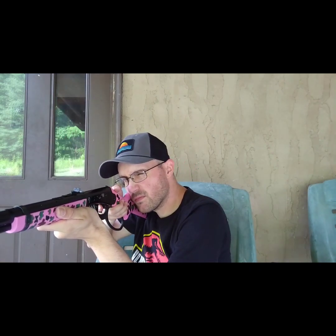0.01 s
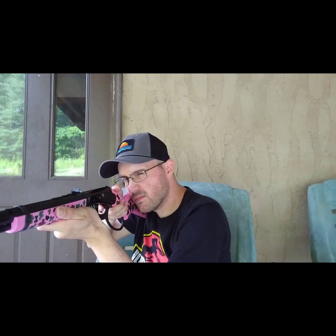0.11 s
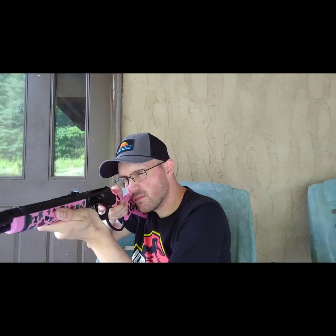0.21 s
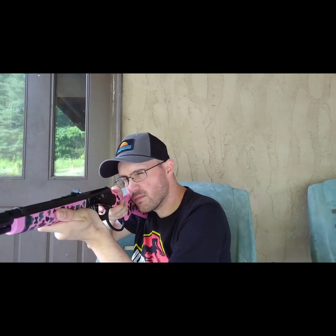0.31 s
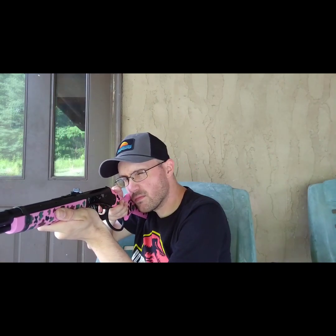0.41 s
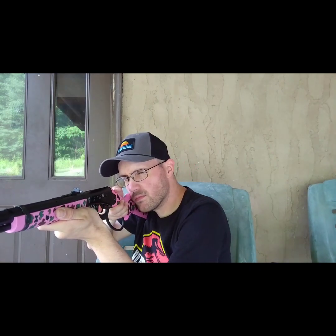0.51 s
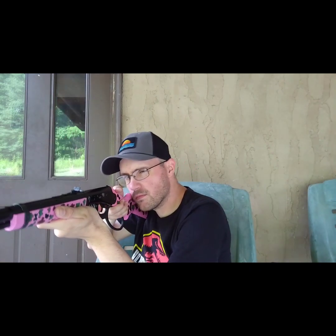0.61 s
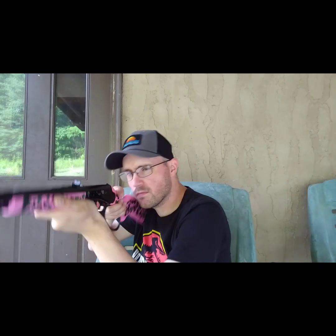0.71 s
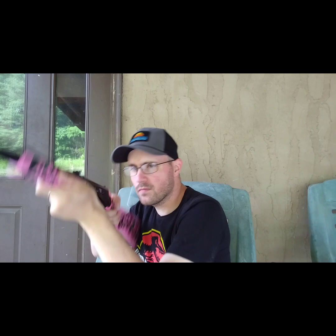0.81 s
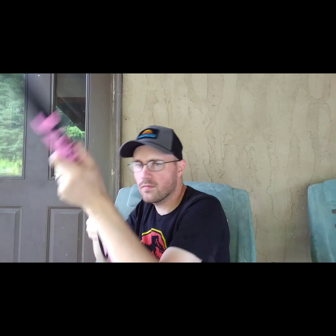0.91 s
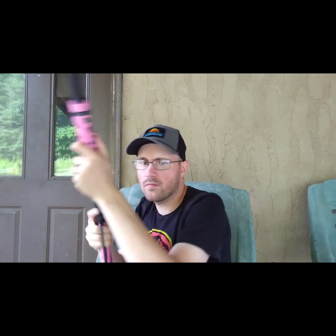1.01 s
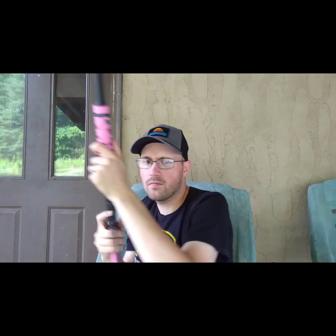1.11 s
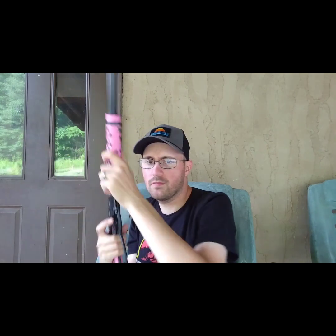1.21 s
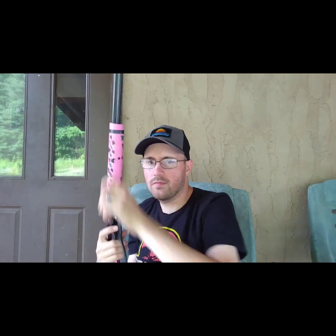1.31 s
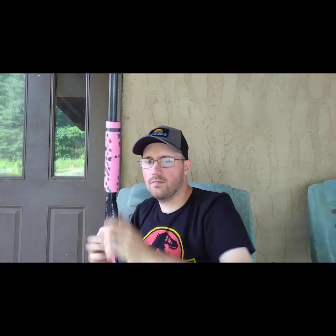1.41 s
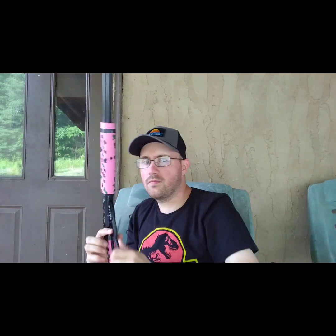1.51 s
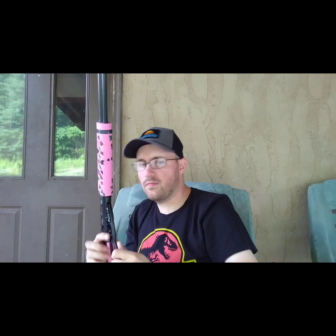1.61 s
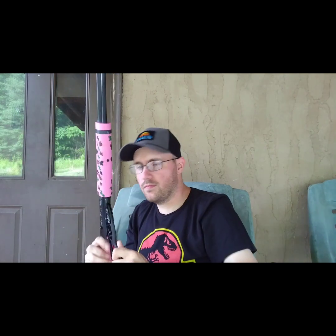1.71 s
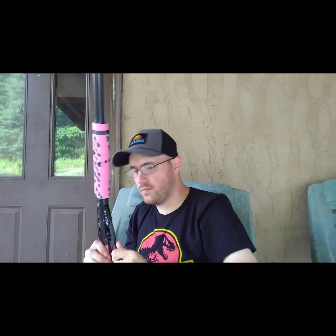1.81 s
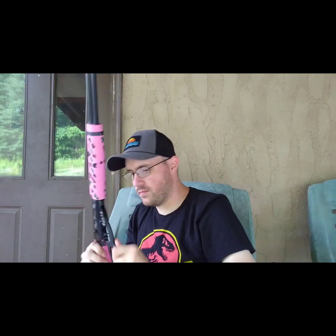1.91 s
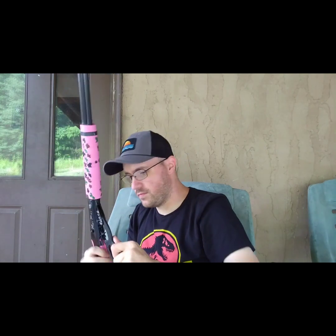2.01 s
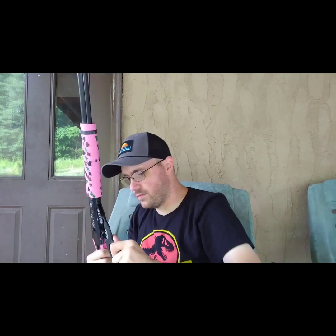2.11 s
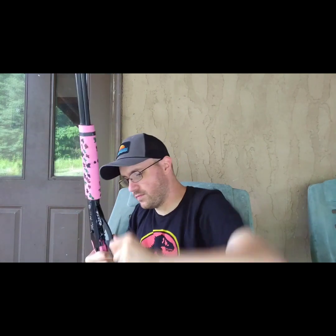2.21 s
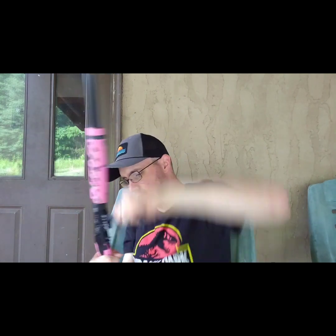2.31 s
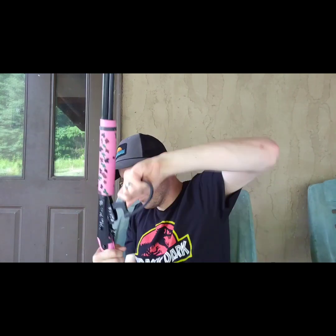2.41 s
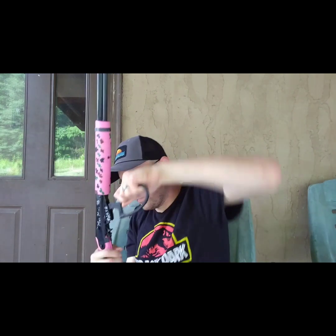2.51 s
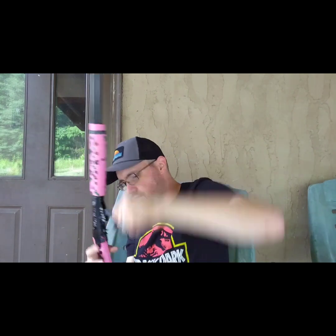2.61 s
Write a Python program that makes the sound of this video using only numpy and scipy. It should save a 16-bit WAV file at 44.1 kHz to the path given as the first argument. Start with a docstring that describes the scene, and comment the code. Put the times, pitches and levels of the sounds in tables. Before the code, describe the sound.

A spring-piston air gun fires with a hard crack, pings metal, then its lever is ratcheted

```python
"""A spring-piston air gun is fired on a porch: the piston slams, the spring buzzes and the pellet pings off metal.
The gun is tipped upright, so loose pellets slide down its magazine; then the lever is cocked over a ratchet.
A songbird repeats one phrase in the trees, over a thin insect trill and a faint outdoor hush.
Impacts are clicks and random grains through coloured filters; metal rings as decaying sines; the bird is
a gliding sine, the insect a narrow-band tone and the hush filtered noise."""
import sys
import numpy as np
from scipy import signal
from scipy.fft import rfft, irfft, next_fast_len
from scipy.io import wavfile

SR = 44100
rng = np.random.default_rng(int(sys.argv[2]) if len(sys.argv) > 2 else 0)


def inscribe(sig):
    """Save sig as 16-bit PCM at rate SR to the path in sys.argv[1].

    A 1-D sig is mono; a 2-D sig holds one channel per row.
    Samples are clipped to [-1, 1] before scaling.
    """
    pcm = np.round(np.clip(np.atleast_2d(sig).T, -1, 1) * 32767)
    wavfile.write(sys.argv[1], SR, pcm.astype(np.int16))


N = 119070
T = np.arange(N) / SR  # time in seconds

SLAM_S = .2299  # the piston strikes
RELEASE_S = .2208  # the spring lets go
CUTOFF_HZ = 9000  # upper limit of the sound

# Spectrum of the released spring and the piston slam. Each row: frequency in Hz, relative level in dB.
SLAM_SPECTRUM = [(25, -35), (75, -3.5), (140, 3.5), (500, -3), (1300, -3.5), (2000, -1), (2600, 7),
                 (3600, -8), (5200, -3.5), (8000, -16)]


def amp(db):
    """Decibels to gain."""
    return 10 ** (np.asarray(db) / 20)


def unit(x):
    """Scale to rms 1."""
    return x / np.sqrt(np.mean(x ** 2) + 1e-20)


def fade(s, t60):
    """Jump to 1 at time s, then lose 60 dB every t60 seconds."""
    return (T >= s) * np.exp(-np.log(1000) * np.maximum(T - s, 0) / t60)


def convolve(x, response):
    """Play x through a response."""
    return signal.fftconvolve(x, response)[:N]


def click(s):
    """One unit impulse at time s."""
    return 1. * (np.arange(N) == int(s * SR))


def colour(x, points):
    """Causal minimum-phase filter with the given spectral shape; white noise keeps its power."""
    size = next_fast_len(2 * N)
    hz = np.maximum(np.arange(size // 2 + 1) * SR / size, 1)
    at, db = np.transpose(points)
    gain = amp(np.interp(np.log(hz), np.log(at), db))
    gain = gain / (1 + (hz / 9500) ** 16)  # steep treble roll-off
    gain = gain / (1 + (at[0] / 2 / hz) ** 2)  # gentle roll-off below the first point
    # folding the cepstrum onto positive time gives minimum phase
    cepstrum = irfft(np.log(unit(gain) + 1e-7), size)
    cepstrum[1:size // 2] *= 2
    cepstrum[size // 2 + 1:] = 0
    response = np.exp(rfft(cepstrum))
    return irfft(rfft(x, size) * response, size)[:N]


def modes(table, s=0):
    """Decaying sines struck at time s, from rows of Hz, dB and t60 in seconds."""
    return sum(amp(db) * fade(s, t60) * np.sin(2 * np.pi * hz * (T - s)) for hz, db, t60 in table)


def scatter(t60, delay=0):
    """A dense, dying cloud of reflections with energy 1."""
    return unit(rng.standard_normal(N) * fade(delay, t60)) / np.sqrt(N)


def grains(curve, per_s, spread_db):
    """Random tiny impacts under a level curve of (seconds, dB) points."""
    signs = rng.choice([-1, 1], N)
    sizes = amp(spread_db * np.minimum(rng.exponential(1, N), 4)) * signs
    hits = rng.random(N) < per_s / SR
    level_db = np.interp(T, *np.transpose(curve), left=-120, right=-120)
    return unit(sizes * hits) * amp(level_db)


def touch(s, chatter_t60):
    """A hard contact: a click and a brief chatter."""
    return .6 * click(s) + .8 * scatter(chatter_t60, s)


def shot():
    """The spring lets go, then surges to and fro, slapping its tube once a cycle while the action rattles."""
    # Spectra of the spring and of the rattling action. Each row: frequency in Hz, relative level in dB.
    spring_spectrum = [(300, -15), (950, -15.5), (1300, -23.5), (1700, 13), (2600, 6), (3300, -7.5),
                       (4600, -14), (8000, -13)]
    rattle_spectrum = [(60, -23), (100, -5.5), (180, -6.5), (300, -3), (420, -6), (600, -11), (1300, -11),
                       (2100, -3.5), (4500, -7), (6000, -13), (7600, -17)]
    release_db, release_t60_s, release_rise_s = -17, 0.092, 0.0027
    spring_hz, spring_db, spring_t60_s, spring_roughness = 137.5, -29.5, 0.16, 0.25
    rattle_db, rattle_t60_s = -21.5, 0.37

    swell = np.clip((T - RELEASE_S) / release_rise_s, 0, 1)
    burst = rng.standard_normal(N) * swell * fade(RELEASE_S, release_t60_s)
    release = colour(burst, SLAM_SPECTRUM)

    # all overtones up to the cutoff, in random phase
    overtones = np.arange(1, int(CUTOFF_HZ / spring_hz))
    surge = unit(sum(np.cos(2 * np.pi * (k * spring_hz * T + rng.random())) for k in overtones))
    buzz = surge + spring_roughness * rng.standard_normal(N)
    spring = colour(buzz * fade(SLAM_S, spring_t60_s), spring_spectrum)

    impacts = grains([(0, 0.0023), (1, 0)], per_s=1200, spread_db=-1.0)  # stops at 1 s
    rattle = colour(impacts * fade(RELEASE_S, rattle_t60_s), rattle_spectrum)
    return amp(release_db) * release + amp(spring_db) * spring + amp(rattle_db) * rattle


def slam():
    """The piston's single hard crack: one filtered impulse."""
    return -amp(10) * colour(click(SLAM_S), SLAM_SPECTRUM)


def boom():
    """A hollow boom of decaying resonances set off by the slam."""
    # Resonances of the boom. Each row: frequency in Hz, level in dB, t60 in seconds.
    boom_modes = [(88.4, -45.5, .9), (145, -33, .6), (373, -31.5, 0.49), (970, -29.5, 0.15)]
    return modes(boom_modes, SLAM_S)


def target():
    """The struck metal rings briefly and is then damped to a faint afterring."""
    # Resonances of the metal. Each row: frequency in Hz, level in dB, undamped t60 in seconds.
    target_modes = [(2935, -38, 0.24), (4666, -22.5, 0.16), (4530, -44, 0.34), (6206, -43.5, 1.2),
                    (6940, -42.5, 0.27)]
    hit_s, hold_s, damped_t60_s, tail_db = .3865, 0.07, 0.066, -23.5
    damp_s = hit_s + hold_s
    hold = np.where(T < damp_s, 1, fade(damp_s, damped_t60_s))
    damping = np.maximum(hold, amp(tail_db))
    onset = 1 - fade(hit_s, 0.024)  # softens the attack
    ping = modes(target_modes, hit_s) * damping * onset
    return ping + amp(-23) * convolve(ping, scatter(.7, .02))


def ticks():
    """Small dry ticks after the shot, and a fine crackle as loose parts settle while the gun is lifted."""
    # Light ticks. Each row: time in seconds, relative level in dB.
    tick_hits = [(0.518, -47.5), (0.527, -37), (0.5488, -27), (0.574, -35), (0.6268, -31), (0.717, -35)]
    # Level curve of the settling parts. Each row: time in seconds, relative level in dB.
    settle_curve = [(.33, -44.5), (.45, -55.5), (.6, -66.5), (.81, -68.5), (.87, -76.5)]
    # Spectrum of both. Each row: frequency in Hz, relative level in dB.
    tick_spectrum = [(600, -15.5), (1800, 0), (5000, -2), (8000, -9.5)]
    dry_ticks = sum(amp(db) * scatter(0.004, s) for s, db in tick_hits)
    crackle = grains(settle_curve, per_s=1500, spread_db=4.5)
    return colour(dry_ticks + crackle, tick_spectrum)


def pellets():
    """A few pellets roll along the ringing magazine tube, then the rest tumble down in a bright rush."""
    # Level curves: pellets creep along the magazine, then rush down it together.
    # Each row: time in seconds, relative level in dB.
    creep_curve = [(1.125, -69), (1.16, -61.5), (1.2, -49.5), (1.225, -55), (1.28, -53.5), (1.36, -41.5),
                   (1.41, -61)]
    slide_curve = [(1.279, -52), (1.284, -38.5), (1.31, -33), (1.323, -28.5), (1.355, -36), (1.39, -41.5),
                   (1.42, -67), (1.46, -70)]
    # Spectrum of the moving pellets. Each row: frequency in Hz, relative level in dB.
    pellet_spectrum = [(200, -33.5), (500, -27.5), (1040, -10), (2300, -3.5), (3200, -1.5), (4400, -2),
                       (5500, -8.5), (7100, -5), (8000, -9), (10400, -39.5)]
    # Resonances of the magazine tube. Each row: frequency in Hz, relative level in dB, t60 in seconds.
    tube_modes = [(1500, -33.5, 0.036), (2300, -28.5, 0.014), (3875, -24.5, 0.0061), (7300, -25.5, .022)]
    impacts_per_s, spread_db = 5000, 2.5
    rolling = grains(creep_curve, impacts_per_s, spread_db)
    rush = grains(slide_curve, impacts_per_s, spread_db)
    flow = colour(rolling + rush, pellet_spectrum)
    tube_ring = convolve(rolling, modes(tube_modes))
    return amp(-1.5) * flow + amp(0.5) * tube_ring


def lever():
    """Each ratchet tooth clicks and rattles around its own pitch; clicks and scraping excite the steel action."""
    # The pawl drops over the teeth. Each row: time in seconds, relative level in dB, rattle pitch in Hz.
    teeth = [(2.3155, -30, 3610), (2.3195, -15.5, 3700), (2.3365, -10.5, 3460), (2.3511, -9.5, 2090),
             (2.3669, -8.5, 2540), (2.385, -9, 2390), (2.3881, -8.5, 3780), (2.411, -29, 4150),
             (2.4258, -8, 2110), (2.428, -11.5, 4030)]
    # Level curves: the lever scrapes as it compresses the spring, and the hand shifts on it.
    # Each row: time in seconds, relative level in dB.
    scrape_curve = [(2.285, -77), (2.311, -55.5), (2.318, -49), (2.355, -32.5), (2.395, -33.5), (2.42, -33),
                    (2.44, -35), (2.485, -50), (2.535, -59), (2.57, -49.5), (2.7, -64.5)]
    rustle_curve = [(2.47, -55.5), (2.7, -64)]
    # Spectrum of the lever. Each row: frequency in Hz, relative level in dB.
    lever_spectrum = [(47, -50.5), (80, -17.5), (163, -23), (388, -13.5), (480, -22), (580, -10),
                      (1810, -5.5), (2940, -4), (7410, -9), (8000, -15), (10400, -44.5)]
    # Resonances of the steel action. Each row: frequency in Hz, relative level in dB, t60 in seconds.
    action_modes = [(2058, -48, 0.082), (2290, -50.5, 0.11), (3550, -51.5, .08), (4040, -46.5, 0.099)]
    pawl_chatter_t60_s = .011
    rattle_db, rattle_t60_s, rattle_width_hz = -4.5, 0.05, 440  # rattle level relative to its tooth

    scrape = amp(-4) * grains(scrape_curve, per_s=4400, spread_db=0.6)
    rustle = grains(rustle_curve, per_s=310, spread_db=3)
    drive = scrape + rustle
    for s, db, hz in teeth:
        band = signal.iirpeak(hz, hz / rattle_width_hz, fs=SR)
        narrow = signal.lfilter(*band, scatter(rattle_t60_s, s) + 1e-18)
        rattle = unit(narrow) / np.sqrt(N)  # energy 1
        drive = drive + amp(db) * (touch(s, pawl_chatter_t60_s) + amp(rattle_db) * rattle)
    body = colour(drive, lever_spectrum)
    return body + convolve(body, modes(action_modes))


def handling():
    """Dull knocks of hands on the stock, each with a short ring at its own pitch."""
    # Hand knocks. Each row: time in seconds, relative level in dB, ring pitch in Hz.
    hand_knocks = [(1.724, -33.5, 2300), (1.761, -37, 3090), (1.983, -29, 1624), (2.001, -23.5, 1200),
                   (2.007, -27.5, 1500), (2.272, -33, 1000), (2.4991, -15.5, 1430), (2.507, -21, 1400)]
    # Spectrum of the stock. Each row: frequency in Hz, relative level in dB.
    stock_spectrum = [(150, -11), (500, -15), (1300, -0.5), (4000, -1.5), (5000, -17), (8000, -15.5)]
    ring_db, ring_t60_s = -19.5, 0.011  # ring level relative to its knock
    knocks = np.zeros(N)
    for s, db, hz in hand_knocks:
        ring = modes([(hz, ring_db, ring_t60_s)], s)
        knocks += amp(db) * (touch(s, chatter_t60=.028) + ring)
    return amp(-5.5) * colour(knocks, stock_spectrum)


def bird():
    """Whistled and trilled notes, sines gliding in pitch, echo among the trees."""
    # Repeats of the phrase. Each row: start in seconds, level offset in dB.
    phrases = [(-.077, -1), (0.311, 3.5), (0.7, -1.5)]
    # Notes of the phrase. Each row: delay in seconds, length in seconds, first, middle and last pitch in Hz,
    # level in dB before the phrase offset, trill depth in Hz.
    notes = [(-.006, 0.022, 3660, 3600, 3564, -45, 50.5), (0.021, 0.023, 3576, 3320, 3220, -42.5, 99.5),
             (0.05, 0.033, 3920, 4105, 4330, -45, 70), (0.112, 0.06, 2690, 2718, 2810, -40.5, 1),
             (0.179, 0.03, 3084, 2905, 2926, -44, 134), (0.227, 0.071, 2470, 2455, 2490, -48, -0.5),
             (0.272, 0.021, 2484, 2400, 2050, -52, 140.5)]
    trill_hz, trees_db, trees_t60_s = 168, -7.5, 0.65
    lead = int(.15 * SR)  # room for a phrase that starts before time zero
    t = np.arange(-lead, N) / SR
    song = np.zeros(lead + N)
    for start, phrase_db in phrases:
        for delay, length, first, middle, last, db, trill_depth in notes:
            on = (t > start + delay) & (t < start + delay + length)
            u = (t[on] - start - delay) / length  # 0 to 1 through the note
            glide = np.interp(u, [0, .5, 1], [first, middle, last])
            trill = trill_depth * np.sin(2 * np.pi * (trill_hz * t[on] + rng.random()))
            swell = np.abs(np.sin(np.pi * u)) ** 1.4
            whistle = np.sin(2 * np.pi * np.cumsum(glide + trill) / SR)
            song[on] += amp(db + phrase_db) * swell * whistle
    echo = signal.fftconvolve(song, scatter(trees_t60_s, 0.013))[lead:lead + N]
    return song[lead:] + amp(trees_db) * echo


def insect():
    """A thin, fast-pulsing trill far away: the phase of resonated noise drives a level tone, then pulses."""
    tone_hz, width_hz, pulse_hz, level_db = 5940, 110, 52, -88.5
    radius = np.exp(-np.pi * width_hz / SR)
    angle = 2 * np.pi * tone_hz / SR
    resonance = signal.lfilter([1], [1, -radius * np.exp(1j * angle)], rng.standard_normal(N))
    tone = np.cos(np.angle(resonance))
    return amp(level_db) * tone * (1 + np.sin(2 * np.pi * pulse_hz * T))


def hush():
    """A faint steady outdoor hush of filtered noise."""
    # Spectrum of the hush. Each row: frequency in Hz, relative level in dB.
    hush_spectrum = [(25, -14), (82, -0.5), (230, -15.5), (470, -19.5), (900, -21.5), (1840, -25.5),
                     (2830, -24), (4070, -30.5), (5710, -35.5), (8000, -37.5), (10400, -66)]
    return amp(-66) * colour(rng.standard_normal(N), hush_spectrum)


def porch_and_yard():
    """Reflections: a short dense porch cloud, then a later, duller and longer one from the yard."""
    # Spectrum of the yard echo. Each row: frequency in Hz, relative level in dB.
    yard_spectrum = [(80, 2), (1500, -2), (4000, -10.5), (8000, -12)]
    porch = amp(-8.5) * scatter(.13, 0.0034)
    yard = amp(-33) * colour(scatter(0.87, 0.058), yard_spectrum)
    return porch + yard


def scene():
    """The gun sounds under the porch roof and echoes from the yard; target, bird, insect and hush lie beyond."""
    gun = shot() + slam() + ticks() + pellets() + lever() + handling()
    echoes = convolve(gun, porch_and_yard())
    beyond = target() + bird() + insect() + hush()
    return (gun + echoes + boom() + beyond)[None]


def record(dry):
    """The slam just overloads the microphone; the deep bass is rolled off and the top is cut steeply."""
    clipped = np.clip(dry, -.95, .95)
    low_cut = signal.butter(2, 55, "high", fs=SR, output="sos")  # 55 Hz
    top_cut = signal.cheby2(16, 75, CUTOFF_HZ, fs=SR, output="sos")  # 75 dB down from the cutoff up
    return signal.sosfilt(top_cut, signal.sosfilt(low_cut, clipped))


dry = scene()
out = record(dry)
inscribe(out)
```